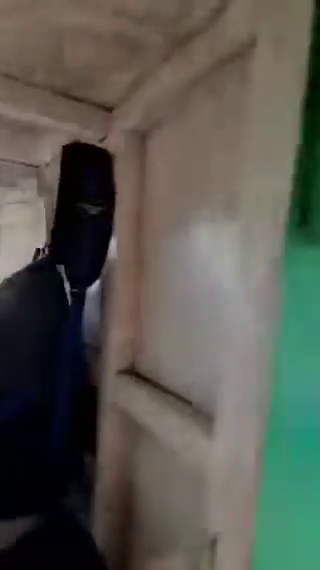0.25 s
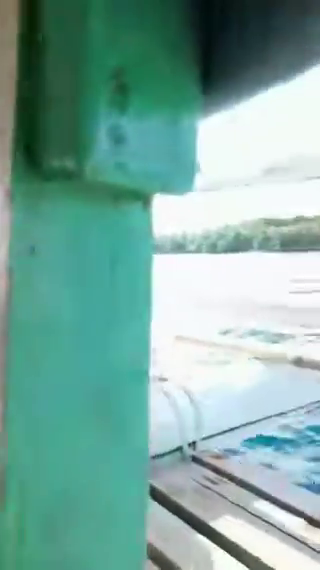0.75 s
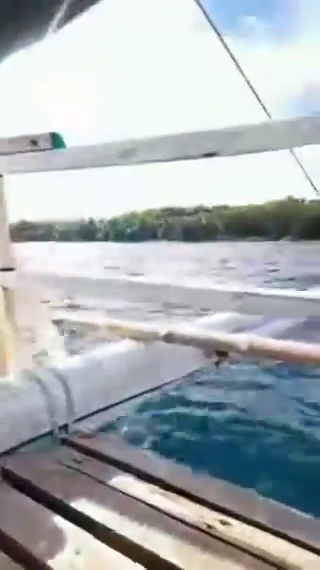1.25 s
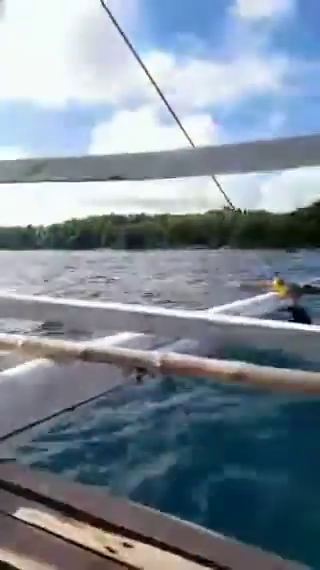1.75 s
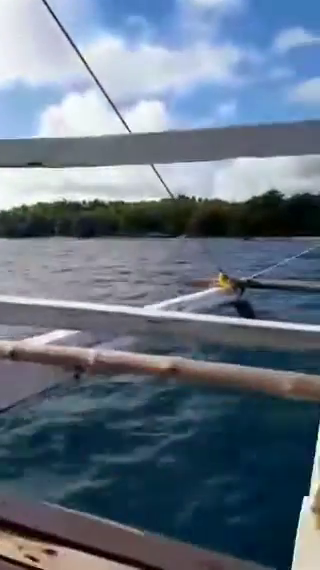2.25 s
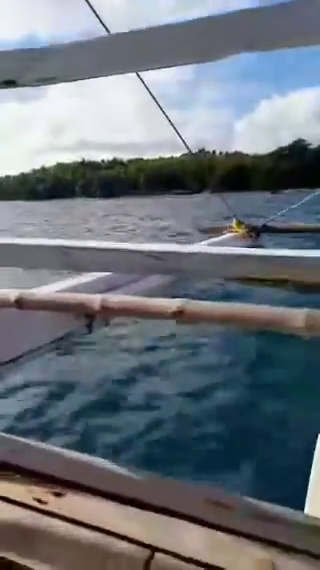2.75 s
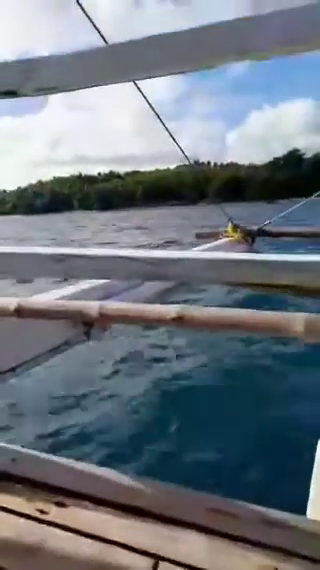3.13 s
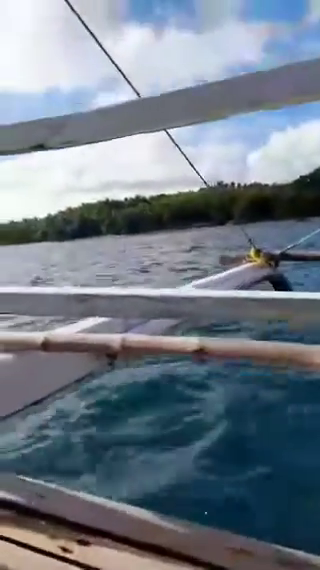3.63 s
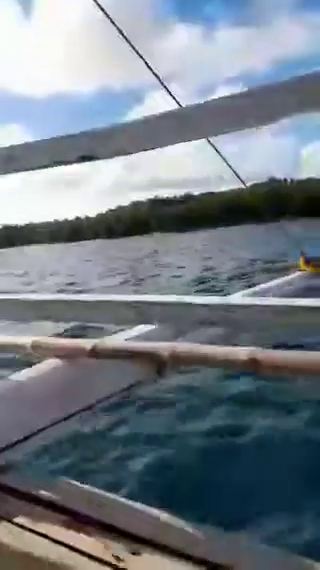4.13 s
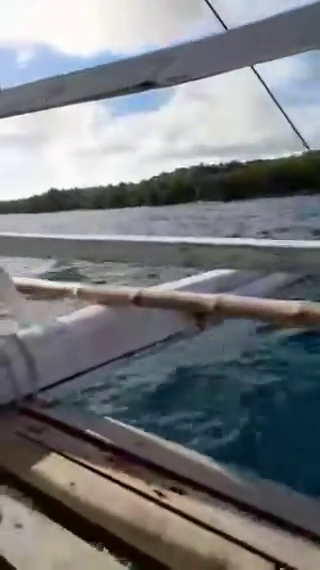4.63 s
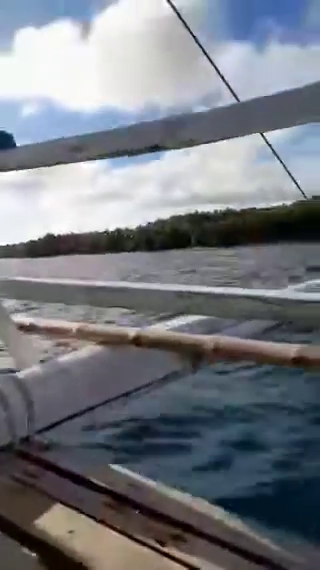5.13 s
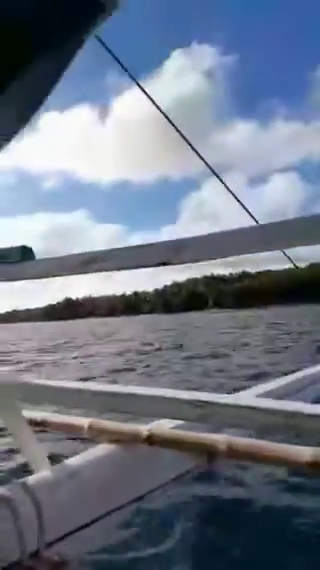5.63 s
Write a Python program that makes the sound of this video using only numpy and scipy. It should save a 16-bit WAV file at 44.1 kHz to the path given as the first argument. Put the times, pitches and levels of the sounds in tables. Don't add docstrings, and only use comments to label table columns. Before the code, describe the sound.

Close, loud, steady motor hum fills the whole take, rough and low with panel buzz and a faint rattle. It begins boxed in by the cabin and changes colour as the phone moves onto deck. Thin wash hiss stays underneath, with a short spray burst near two seconds, a splash near four and another at the end. Wind flutters unevenly across both channels; phone sound, slightly saturated, with dulled, patchy treble.

```python
import sys
import numpy as np
from scipy import signal
from scipy.fft import rfft, irfft, dct, next_fast_len
from scipy.io import wavfile
from scipy.ndimage import uniform_filter1d

SR = 44100
rng = np.random.default_rng(int(sys.argv[2]) if len(sys.argv) > 2 else 0)


def dump(signal):
    limited = np.clip(np.atleast_2d(signal).T, -1, 1)
    pcm = np.round(limited * 32767).astype(np.int16)
    wavfile.write(sys.argv[1], SR, pcm)


def volts(x):
    e = np.asarray(x, float) / 20
    return 10 ** e


N = 258867
PAD = next_fast_len(N)


def curves(table):
    s, *columns = np.transpose(table)
    return [np.interp(np.arange(N) / SR, s, c) for c in columns]


def shape_db(table, hz):
    f, db = np.transpose(table)
    return np.interp(np.log(np.maximum(hz, 1)), np.log(f), db, left=-90, right=-90)


def coloured(db, count=1):
    spectrum = rfft(rng.standard_normal((count, PAD))) * volts(db)
    y = irfft(spectrum, PAD)[:, :N]
    return y / np.sqrt(np.mean(y ** 2))


def walk(rate):
    k = int(SR / rate)
    held = np.repeat(rng.standard_normal(N // k + 1), k)
    return 1.82 * uniform_filter1d(uniform_filter1d(held, k), k)[:N]


def bumps(when, size, length):
    t = np.arange(N) / SR
    return sum(a * np.exp(-.5 * ((t - s) / w) ** 2) for s, a, w in np.broadcast(when, size, length))


# time in seconds, engine cycles in Hz.
ENGINE_SPEED = [(0.0, 16.512), (0.49, 16.471), (0.98, 16.439), (1.47, 16.456), (1.96, 16.517),
                (2.45, 16.496), (2.93, 16.49), (3.42, 16.486), (3.91, 16.477), (4.4, 16.455),
                (4.89, 16.496), (5.38, 16.451), (5.87, 16.411)]


def crank_position():
    return np.cumsum(curves(ENGINE_SPEED)[0]) / SR


def play(lines, crank, size=4096):
    cycle = irfft(lines, size) * size / np.sqrt(2)
    return np.interp(crank % 1, np.arange(size + 1) / size, np.append(cycle, cycle[0]))


# order of the cycle, cabin level in dB, deck left in dB,
# deck right in dB, lead of the left port in radians.
HULL_ORDERS = [(4.0, -20.0, -23.0, -25.0, 0.1), (6.0, -17.0, -18.0, -18.0, -0.2),
               (9.0, -19.0, -20.0, -19.0, -0.1), (10.0, -31.0, -31.0, -29.0, -0.3),
               (11.0, -29.0, -31.0, -28.0, -0.0), (15.0, -22.5, -21.0, -23.0, 0.3),
               (16.0, -26.0, -26.0, -28.0, -0.2), (17.0, -31.0, -32.0, -29.0, -1.5),
               (19.0, -33.0, -41.0, -41.0, -1.5), (20.0, -33.0, -39.0, -40.0, 0.1),
               (25.0, -45.0, -43.0, -43.0, -0.3)]
UPPER_PANEL_ORDERS = [ (32.0, -62.0, -40.0, -38.0, -0.4), (33.0, -36.0, -40.0, -33.0, -0.9),
                      (39.0, -42.0, -50.0, -54.0, -0.5), (40.0, -43.0, -59.0, -50.0, 2.5),
                      (42.0, -53.0, -45.0, -43.0, 0.4), (43.0, -47.0, -43.0, -42.0, -0.1),
                      (44.0, -36.0, -38.5, -38.5, -0.4), (47.0, -47.0, -55.0, -63.0, -1.2),
                      (48.0, -47.0, -49.0, -56.0, 2.0), (50.0, -46.0, -67.0, -61.0, -0.5),
                      (51.0, -47.0, -44.0, -46.0, -0.2), (52.0, -43.0, -46.0, -37.0, 0.6),
                      (58.0, -47.0, -67.0, -43.0, -1.0), (59.0, -48.0, -49.0, -51.0, 0.1),
                      (60.0, -61.0, -59.0, -47.0, -1.3), (61.0, -68.0, -52.0, -47.0, 2.0),
                      (63.0, -53.0, -57.0, -47.0, 0.9), (66.0, -65.0, -64.0, -52.0, 1.3),
                      (70.0, -56.0, -55.0, -52.0, -0.5), (75.0, -60.0, -51.0, -49.0, 0.4),
                      (77.0, -55.0, -60.0, -53.0, -2.7)]
# frequency in Hz, level in dB.
HULL_RESPONSE = [(16, -54), (33, -51), (50, -40.5), (82, -34.5), (132, -36.5), (165, -31.5), (200, -42),
                 (232, -43), (297, -60), (410, -51), (600, -55), (1000, -63.5), (1600, -64.5), (3000, -76)]
STRIKE_TIMES = [(4, .214), (6, .117), (9, .229), (11, .293), (15, .28), (16, .937), (17, .55), (20, .87),
                (33, .75), (44, .33), (52, .53), (999, .4)]
# time in seconds, share of the way from cabin to deck (0-1),
# upper panel level in dB.
PHONE_SWING = [(0, 0, -0.5), (.5, 0.16, 3.5), (.9, 0.24, 2), (1.1, 0.43, 4.5), (1.4, 0.55, 7),
               (1.8, 0.83, 0.5), (2.4, 1, -1), (3.2, 1, 0.5), (4, 0.94, 1.5), (4.8, 0.88, 3),
               (5.3, 0.82, 3.5), (5.87, 0.63, 6)]


def engine(crank, count=180, scatter_db=4.5, cabin_lag=2.78):
    k = np.arange(count)
    chance = rng.standard_normal((count, 6)).T
    scatter = scatter_db * np.minimum(k / 30, 1) * chance[:3]
    cabin, left, right = shape_db(HULL_RESPONSE, k * ENGINE_SPEED[0][1]) + scatter
    lead = chance[3] * np.minimum(k / 40, 2)

    top, struck = np.transpose(STRIKE_TIMES)
    phase = -2 * np.pi * np.cumsum(struck[np.searchsorted(top, k)] * (k > 0))
    order, *heard = np.transpose(HULL_ORDERS + UPPER_PANEL_ORDERS)
    strong = order.astype(int)
    loose_phase = (k > 17) * (~np.isin(k, strong) | (k > 52))
    phase += 2 * chance[4] * loose_phase
    cabin[strong], left[strong], right[strong], lead[strong] = heard

    deck, upper_db = curves(PHONE_SWING)
    deck = np.clip(deck, 0, 1)
    upper = k > 26
    wobble = []
    for rate in (1.5, 9.):
        turn = rng.standard_normal(count) + 1j * rng.standard_normal(count)
        wobble.append((turn, walk(rate)))

    out = []
    for side, db in ((0.49, left), (-0.5, right)):
        indoors = volts(cabin) * np.exp(1j * (phase - cabin_lag * upper + 0.99 * side * lead))
        outdoors = volts(db) * np.exp(1j * (phase + side * lead))
        port = 0
        for lines, share in ((indoors, 1 - deck), (outdoors, deck)):
            steady = play(lines * ~upper, crank) + volts(upper_db) * play(lines * upper, crank)
            loose = lines * np.where(upper, .08, .02)
            drift = sum(w * play(loose * z, crank) for z, w in wobble)
            port = port + share * (steady + drift)
        out.append(port)
    return np.array(out)


# frequency in Hz, density in dB per Hz.
CLATTER_SPECTRUM = [(250, -22), (330, -7), (450, -2), (600, -5), (800, -6.5), (1100, -10), (1500, -19.5),
                    (2200, -24.5)]


def clatter(crank, hz, db=-38, depth=0.22, at=0.72, alike=1.0):
    gate = np.exp(depth * np.cos(2 * np.pi * (crank - at)))
    noise = coloured(shape_db(CLATTER_SPECTRUM, hz), count=3)
    return volts(db) * gate * (alike * noise[0] + noise[1:])


# time in seconds, level in dB.
WASH_SWELL = [(0, -40), (.45, -42), (1.35, -41.5), (1.75, -41.5), (2.2, -41.5), (2.45, -40.5),
              (2.95, -40.5), (4.63, -40.5), (5.2, -40.5), (5.67, -41), (5.87, -39)]
# frequency in Hz, density in dB per Hz.
WASH_SPECTRUM = [(760, -32), (1300, -3.5), (1710, -14), (2530, -10), (3170, -15), (3670, -13),
                 (6540, -20.5), (7360, -20.5), (9040, -25), (10200, -31), (12200, -27.5), (13100, -35),
                 (13500, -80)]
# frequency in Hz, left minus right in dB.
PORT_DIFFERENCE = [(300, -2), (1000, -6.5), (2500, 0.5), (6000, -0.5), (8500, 5), (10500, 4.5), (13000, -6)]
# time in seconds, lift in dB, length in seconds.
SPRAY_BURSTS = [
    (.32, 0.5, .03),
    (.65, 0.5, .04),
    (1.91, 3, 0.03),
    (2.904, 1, 0.18),
    (3.964, 2, 0.096),
    (5.82, 3, 0.09),
]


def wash(hz, db=0.5, fizz_db=0.72, hold=0.37):
    level_db = curves(WASH_SWELL)[0]
    spray_db = bumps(*np.transpose(SPRAY_BURSTS)) - hold * level_db
    balance = np.interp(hz, *np.transpose(PORT_DIFFERENCE))
    colour = shape_db(WASH_SPECTRUM, hz) + np.array([balance, -balance]) / 2
    noise = rfft(coloured(colour, count=2), PAD)
    edges = 600 * 2 ** np.arange(0, 5.1, .5)
    out = 0
    for lo, hi in zip(edges, edges[1:]):
        band = irfft(noise * ((hz >= lo) & (hz < hi)), PAD)[:, :N]
        fine = np.clip(np.log2(hi / 4800), 0, 1)
        fizz = spray_db - np.mean(spray_db) + fizz_db * walk(150)
        swell = .8 * walk(14) + fine * fizz
        out = out + volts(swell) * band
    return volts(level_db + db) * out


# time in seconds, left level in dB, right level in dB.
PORT_BREEZE = [(0, -23.5, -39), (.3, -18, -16), (.75, -21.5, -37.5), (1.4, -18.5, -31.5), (2.1, -22, -25.5),
               (2.6, -17, -26.5), (3.25, -30, -21.5), (3.7, -20, -19), (4.4, -24.5, -18), (5.15, -24, -22),
               (5.87, -19, -30.5)]


def gust_db(breeze_db, eddies, puff_db=-1, puff_s=0.054, late_s=0.038):
    s, level_db, _ = np.transpose(eddies)
    puffs = bumps(s + late_s, volts(level_db + puff_db) ** 2, puff_s)
    return 10 * np.log10(volts(breeze_db) ** 2 + puffs)


# frequency in Hz, density in dB per Hz.
WIND_SPECTRUM = [(20, -26), (40, -10), (60, -3), (120, -5), (200, -4), (270, -5), (350, -17), (500, -30),
                 (800, -42), (1200, -54)]


def wind(hz, db=-3, flutter_db=2.0, top_flutter_db=2.0, follow=1.31):
    out = []
    for gust in map(gust_db, curves(PORT_BREEZE), (LEFT_EDDIES, RIGHT_EDDIES)):
        noise = coloured(shape_db(WIND_SPECTRUM, hz))[0]
        low = signal.sosfilt(signal.butter(2, 220, fs=SR, output="sos"), noise)
        lift_db = (follow - 1) * (gust - np.mean(gust))
        flutter = walk(21.99)
        body = volts(flutter_db * flutter) * low
        edge = volts(lift_db + top_flutter_db * (flutter + walk(60))) * (noise - low)
        out.append(volts(gust + db) * (body + edge))
    return np.array(out)


# start in seconds, level in dB, sharpness in dB.
LEFT_EDDIES = [(0.617, -15, -7), (0.948, -22, -20), (1.041, -20, -20), (1.138, -17, -21), (1.24, -18, -11),
               (1.451, -21, -17), (1.706, -21, -19), (1.823, -22, -20), (2.122, -21, -16),
               (2.403, -19, -16), (2.442, -18, -22), (2.782, -15, -19), (2.834, -21, -15),
               (2.966, -21, -15), (3.109, -17, -18), (3.641, -23, -14), (3.886, -22, -17),
               (3.947, -19, -21), (4.005, -18, -22), (4.037, -18, -16), (4.15, -18, -16), (4.185, -13, -11),
               (4.328, -17, -9), (4.457, -21, -20), (4.735, -20, -19), (4.978, -21, -15), (5.576, -14, -15),
               (5.65, -21, -19)]
RIGHT_EDDIES = [
    (0.008, -25, -15),
    (0.259, -25, -18),
    (0.372, -20, -18),
    (0.425, -17, -20),
    (0.589, -24, -14),
    (3.496, -25, -16),
    (4.063, -24, -15),
    (5.752, -24, -17),
    (5.778, -18, -8),
    (5.842, -25, -9),
]


def slaps(table, db=9, sharp_db=3, spread_s=.012, count=3):
    dull, sharp = np.zeros((2, N))
    for s, level_db, rel_db in table:
        when, size = rng.standard_normal((2, count))
        times = s + spread_s * np.abs(when) * np.arange(count) / count
        i = np.clip((times * SR).astype(int), 0, N - 1)
        size = np.sign(size) * .5 ** np.arange(count) * volts(level_db + db)
        dull[i] += size
        sharp[i] += size * volts(rel_db + sharp_db)
    out = 0
    for steps, band in ((dull, [150, 470]), (sharp, [470, 1250])):
        ring = signal.butter(2, band, "band", fs=SR, output="sos")
        out = out + signal.sosfiltfilt(ring, steps) * SR / (2 * np.ptp(band))
    return out


def patches(count, size, frames, bins):
    field = rng.standard_normal((2, count // frames + 1, size // bins))
    return field.repeat(frames, axis=1).repeat(bins, axis=2)[:, :count]


# frequency in Hz, chance bar in spreads (higher = more gaps).
TREBLE_GAPS = [(900, -3), (1400, -2.2), (2600, -1.4), (4700, -1.0), (9200, -1.1), (9700, -.1),
               (11000, -.55), (12700, -.5), (13000, .6), (13200, 5), (22050, 5)]


def thin(x, size=1024, start=500):
    h, count = size // 2, N // size + 3
    window = np.sin(np.pi * (np.arange(2 * size) + .5) / (2 * size))
    mid_side = np.array([x[0] + x[1], x[0] - x[1]]) / 2
    padded = np.pad(mid_side, ((0, 0), (2 * size - start, 3 * size)))
    f = padded[:, np.arange(count)[:, None] * size + np.arange(2 * size)] * window
    a, b, c, d = f[..., :h], f[..., h:size], f[..., size:3 * h], f[..., 3 * h:]
    folds = np.concatenate([-c[..., ::-1] - d, a - b[..., ::-1]], axis=-1)
    lines = dct(folds, type=4, norm="ortho")

    wide = np.where(np.arange(size) > 440, .75, .35)
    streaks = .5 * patches(count, size, 4, 2) + .85 * patches(count, size, 3, 8)
    chance = np.sqrt(1 - wide ** 2) * streaks + wide * patches(count, size, 2, 32)
    uneven = volts((2.3 * patches(count, size, 3, 2) - .6) * (np.arange(size) > 80))
    line_hz = (np.arange(size) + .5) * SR / 2 / size
    bar = np.interp(line_hz, *np.transpose(TREBLE_GAPS), left=-9)

    folded = dct(lines * uneven * (chance > bar), type=4, norm="ortho")
    u, v = folded[..., :h], folded[..., h:]
    first = np.concatenate([v, -v[..., ::-1]], axis=-1) * window[:size]
    second = np.concatenate([-u[..., ::-1], -u], axis=-1) * window[size:]
    mid, side = (first[:, 1:] + second[:, :-1]).reshape(2, -1)[:, size - start:][:, :N]
    return np.array([mid + side, mid - side])


def scene():
    crank = crank_position()
    hz = np.arange(PAD // 2 + 1) * SR / PAD
    buffets = wind(hz) + np.array([slaps(LEFT_EDDIES), slaps(RIGHT_EDDIES)])
    return engine(crank) + clatter(crank, hz) + wash(hz) + buffets


def roll_off(x):
    return signal.sosfilt(signal.butter(12, 14060, fs=SR, output="sos"), x)


def record(dry):
    rounded = np.clip(np.tanh(0.72 * dry) / 0.69, -.92, .92)
    mix = thin(rounded)
    return roll_off(mix)


dry = scene()
out = record(dry)
dump(out)
```